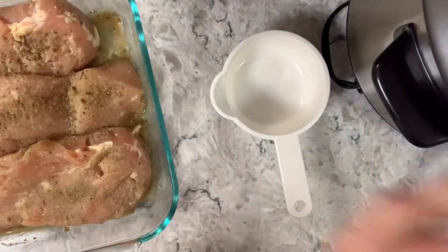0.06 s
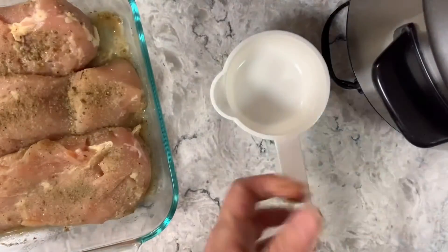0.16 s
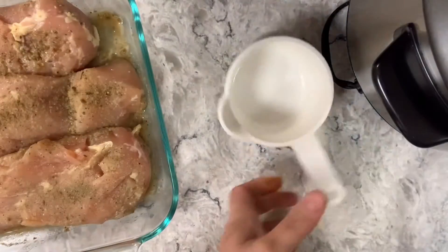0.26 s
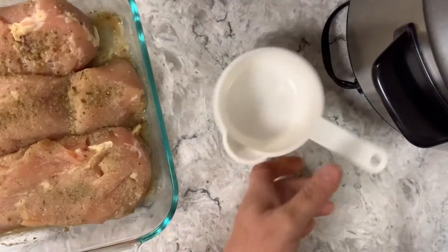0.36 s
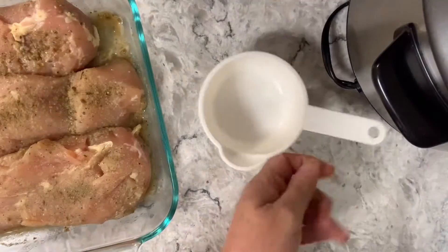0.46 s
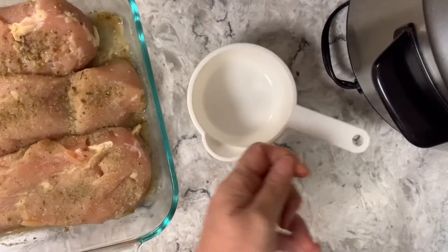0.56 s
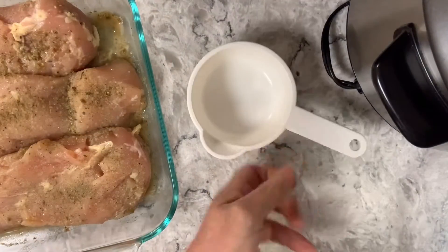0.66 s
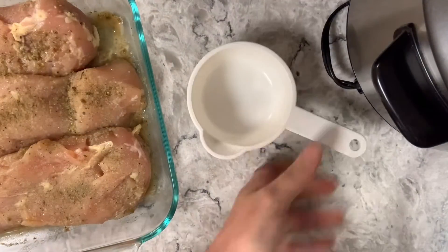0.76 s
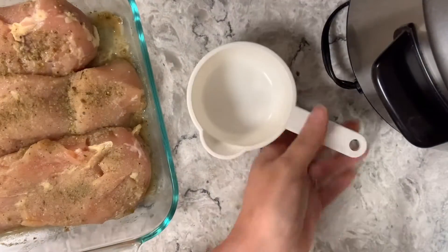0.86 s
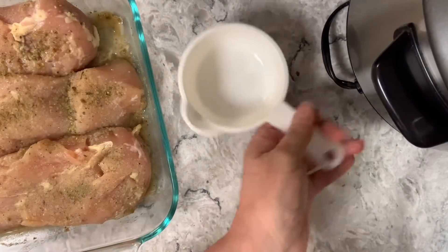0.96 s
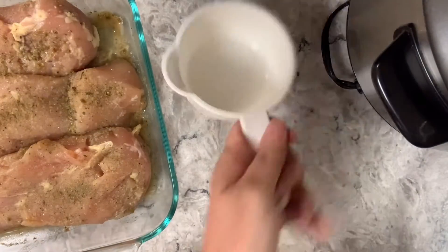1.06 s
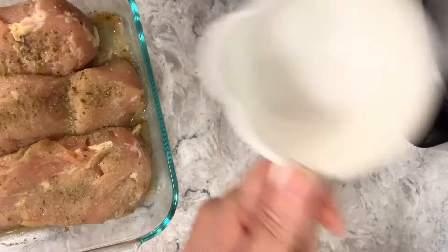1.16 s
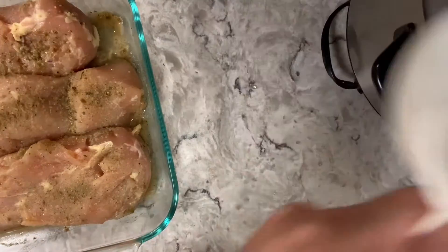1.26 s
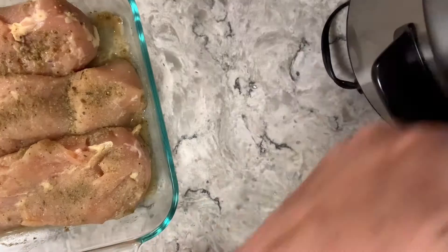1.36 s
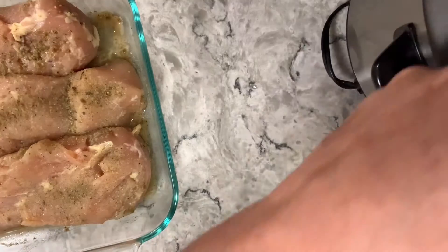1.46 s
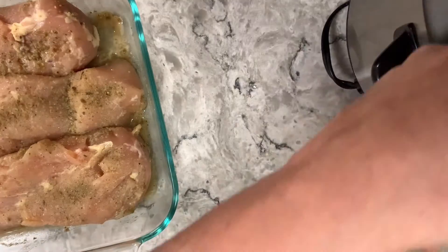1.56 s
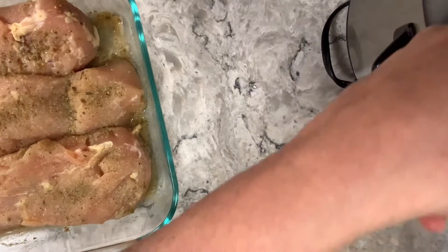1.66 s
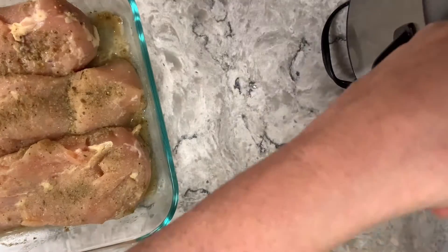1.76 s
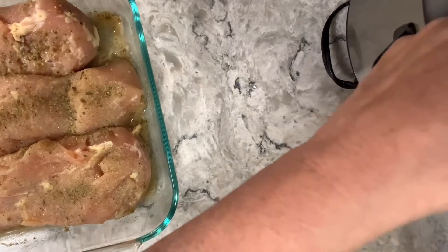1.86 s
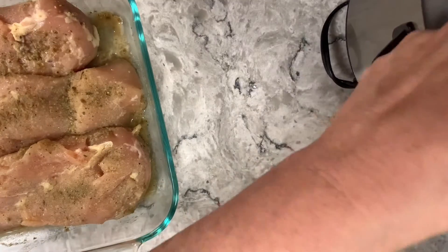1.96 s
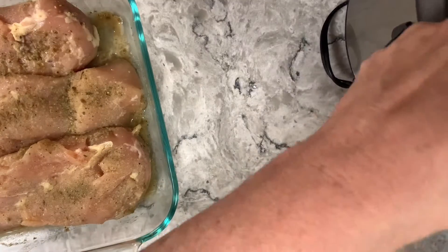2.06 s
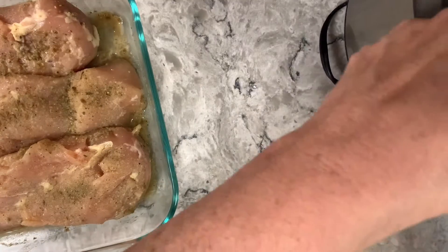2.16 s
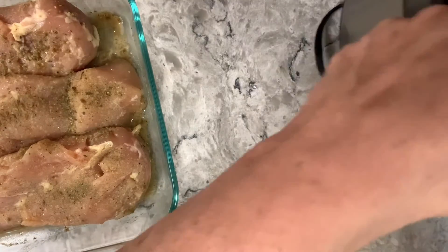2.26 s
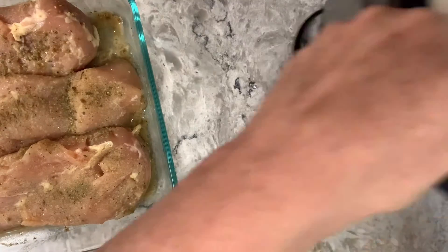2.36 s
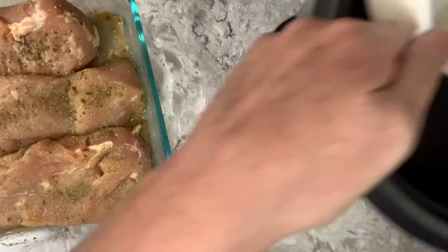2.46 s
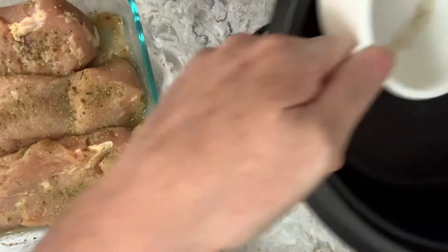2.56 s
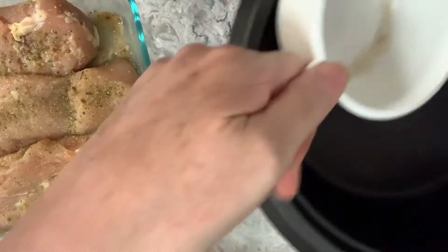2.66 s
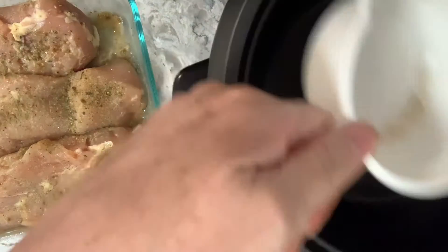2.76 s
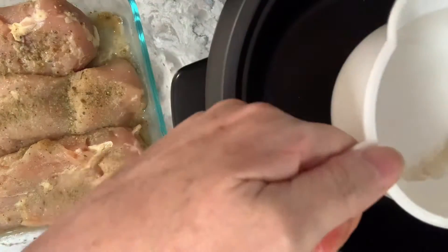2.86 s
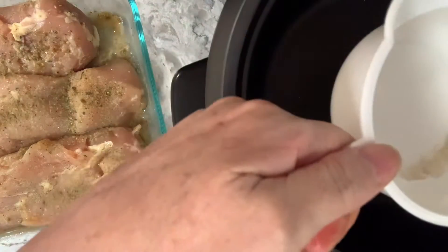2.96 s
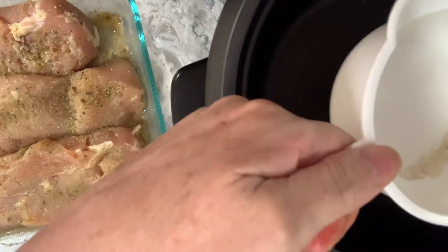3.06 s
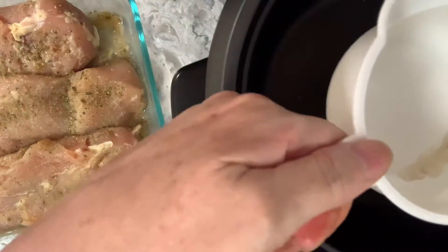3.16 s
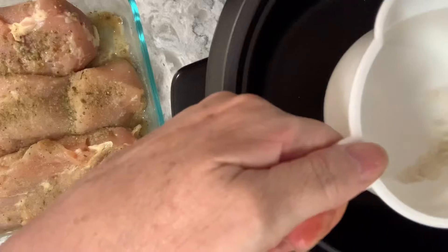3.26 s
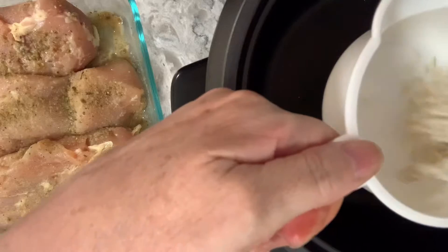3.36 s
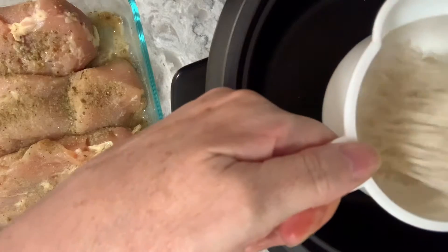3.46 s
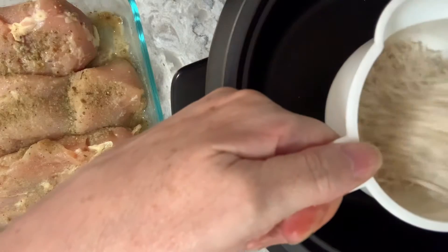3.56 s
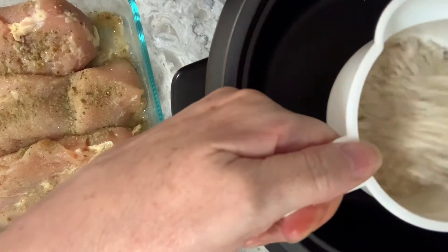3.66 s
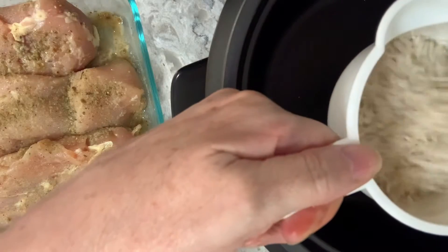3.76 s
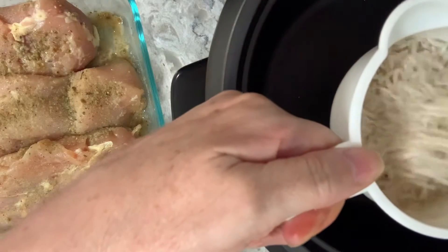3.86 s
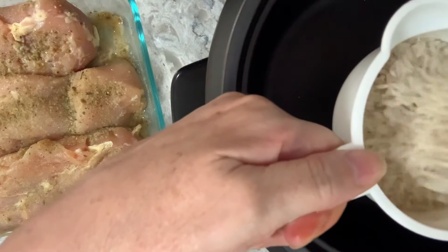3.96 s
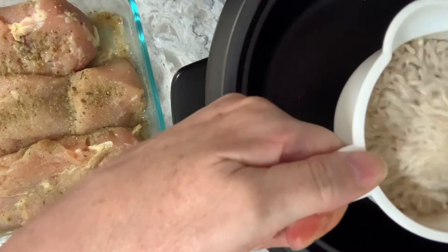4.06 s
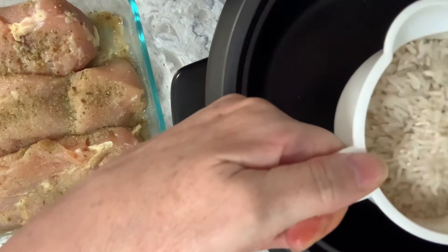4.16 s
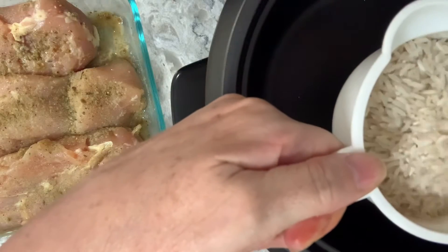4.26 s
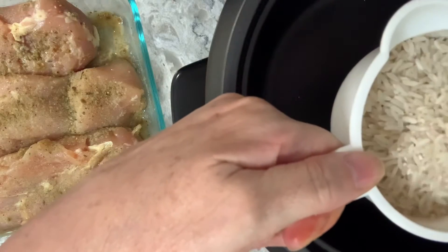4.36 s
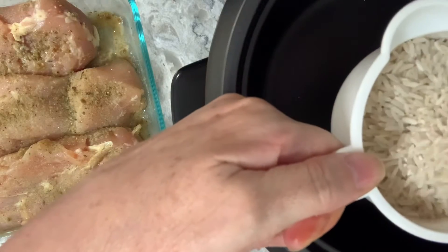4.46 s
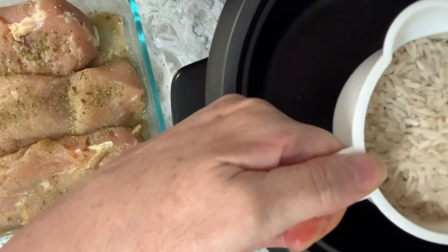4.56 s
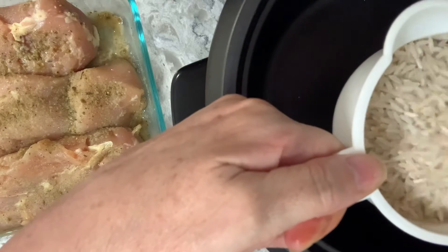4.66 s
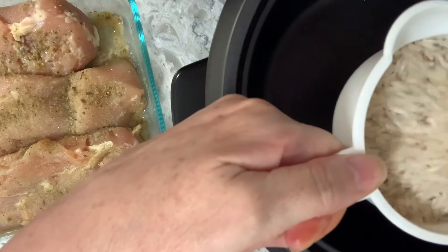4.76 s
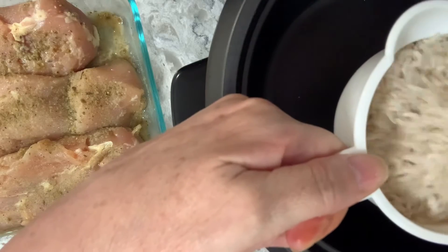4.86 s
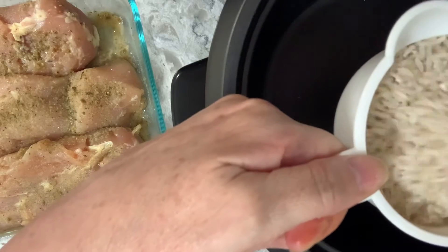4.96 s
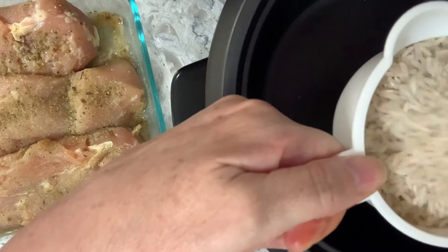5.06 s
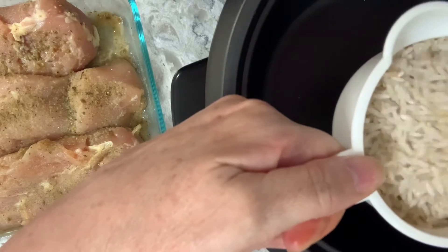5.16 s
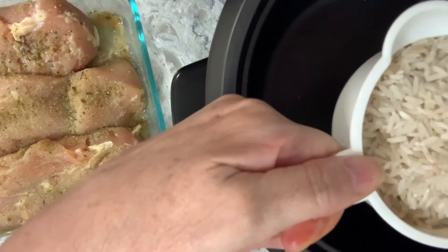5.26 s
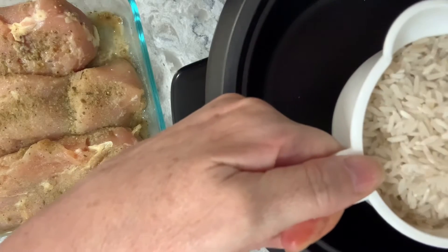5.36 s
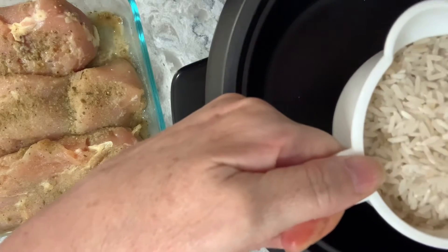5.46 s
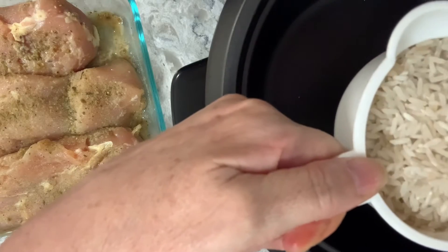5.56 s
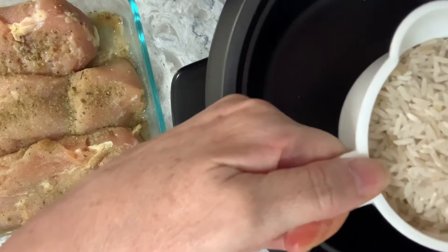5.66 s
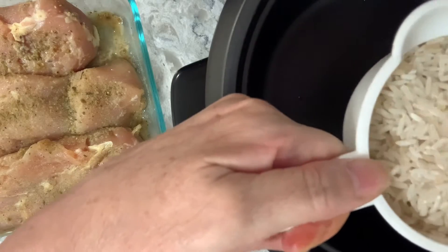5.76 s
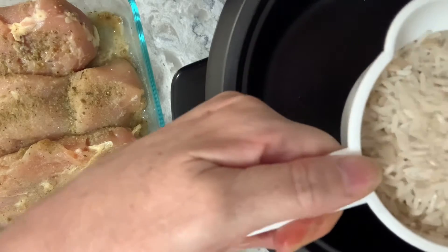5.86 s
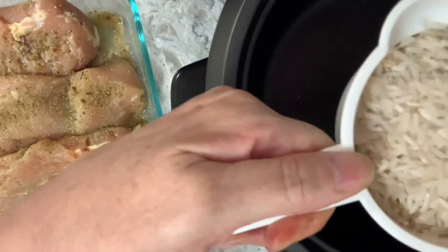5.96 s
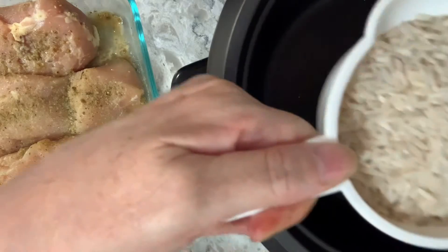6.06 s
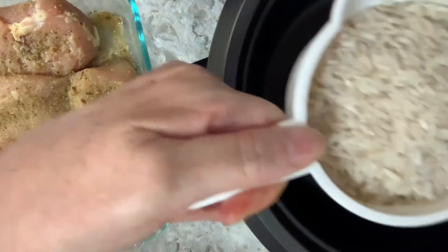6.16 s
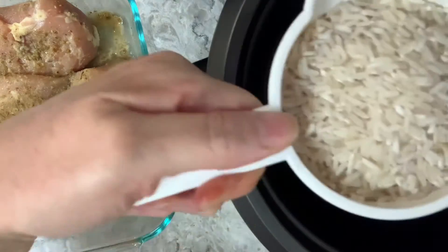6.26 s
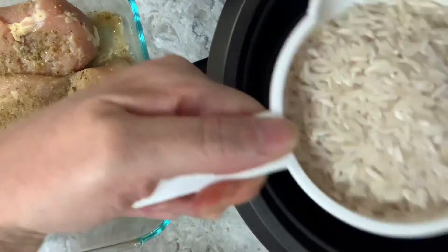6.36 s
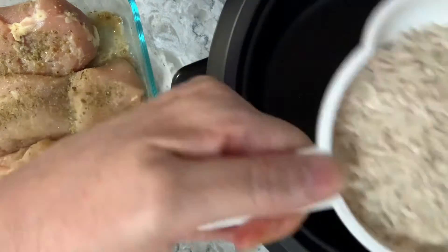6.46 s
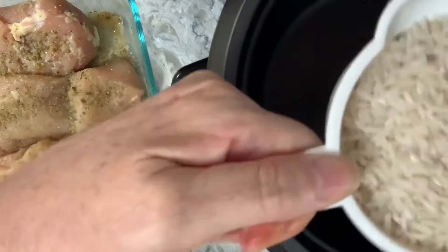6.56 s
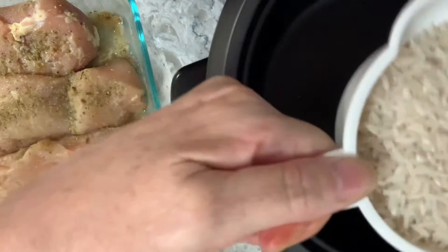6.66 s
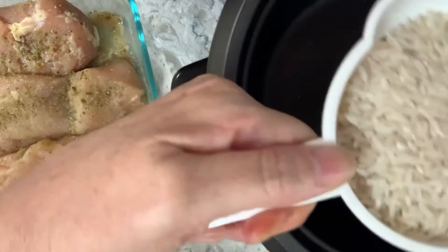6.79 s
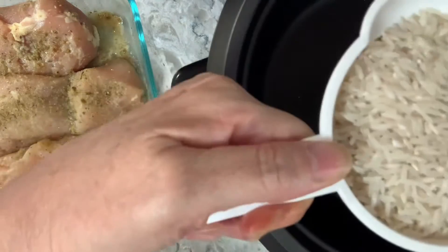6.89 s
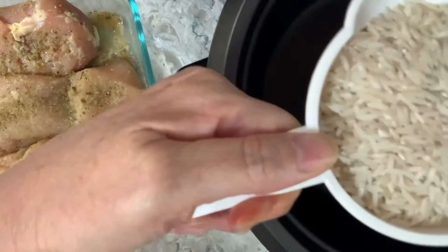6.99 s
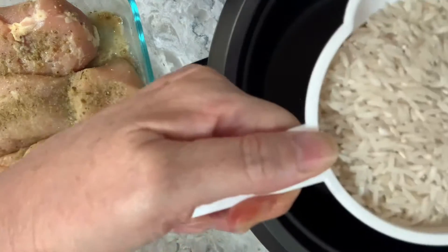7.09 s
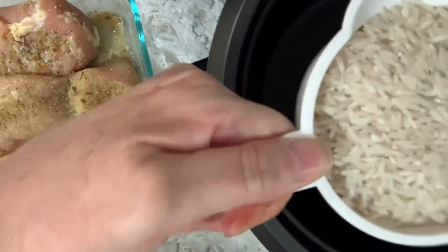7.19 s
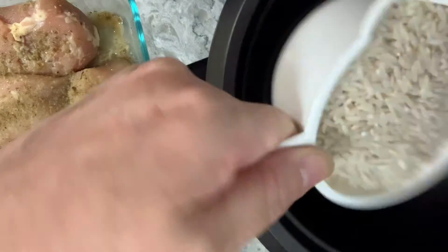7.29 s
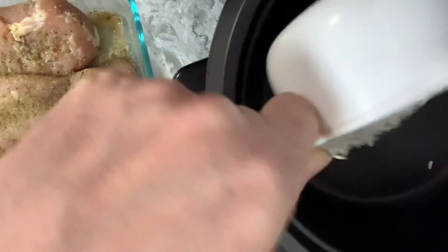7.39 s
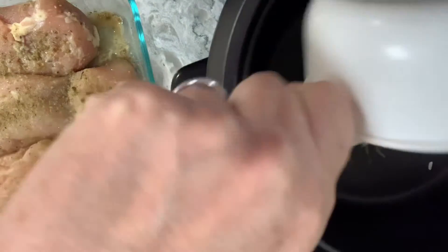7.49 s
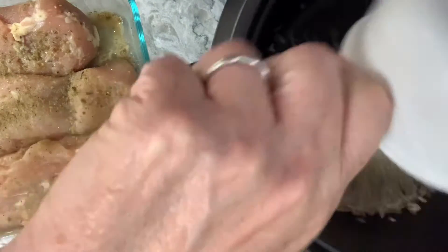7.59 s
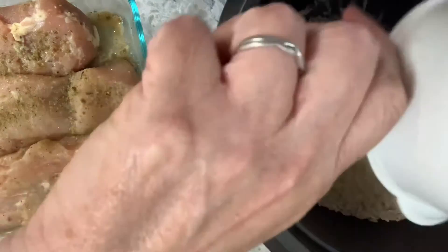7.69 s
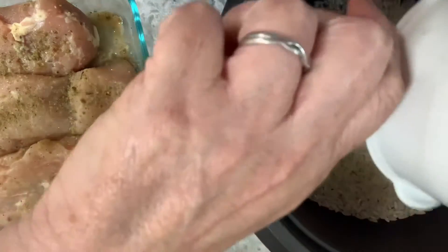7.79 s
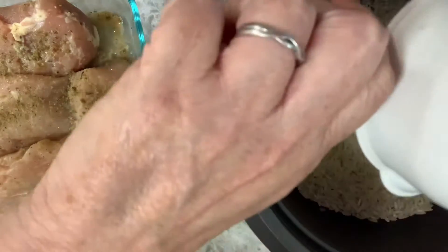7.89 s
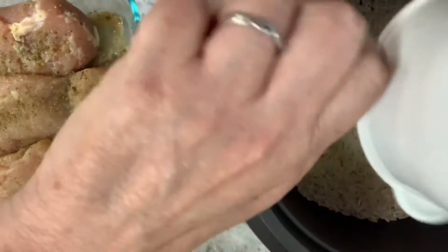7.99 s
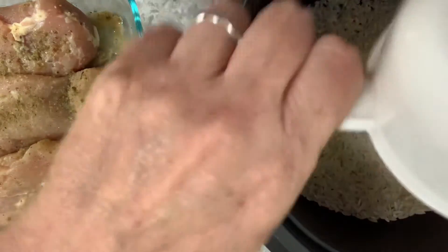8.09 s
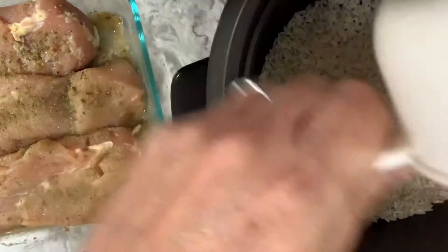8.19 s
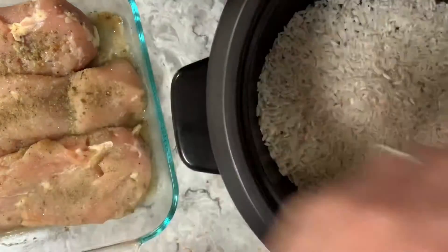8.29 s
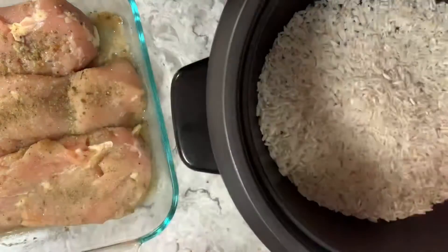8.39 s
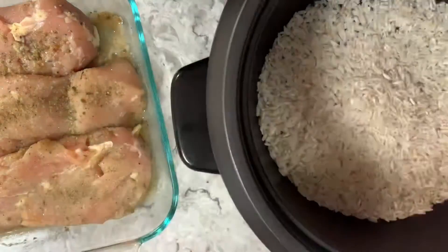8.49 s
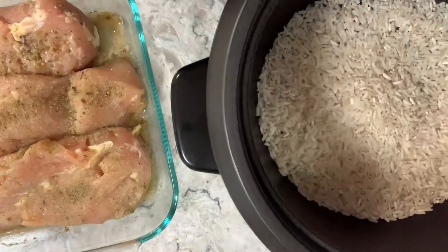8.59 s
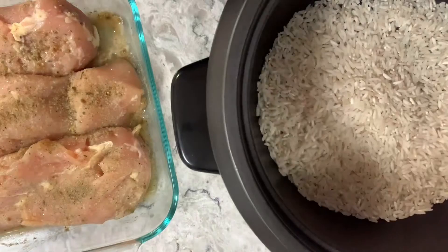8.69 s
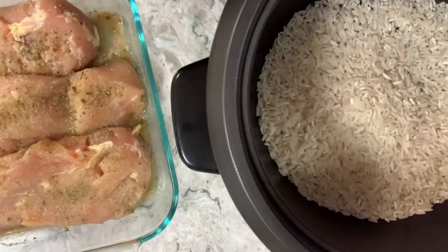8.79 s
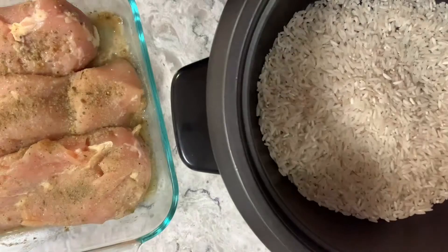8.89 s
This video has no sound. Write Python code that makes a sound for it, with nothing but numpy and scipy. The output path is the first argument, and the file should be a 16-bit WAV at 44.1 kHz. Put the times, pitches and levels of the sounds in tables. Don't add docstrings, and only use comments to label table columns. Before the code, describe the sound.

Close stereo phone capture in a tiled kitchen with a soft fridge hum. Fingers brush stone and a plastic cup clacks; a pot bumps and grinds along the counter. Dry rice rattles brightly into the hollow cup, thins to trickling grains, then the cupful crashes into the pot with a metallic hiss. A last few ticks and a sleeve rustle follow.

```python
import sys
import numpy as np
from scipy import signal
from scipy.fft import rfft, irfft, next_fast_len
from scipy.io import wavfile
from scipy.ndimage import uniform_filter1d

SR = 44100
rng = np.random.default_rng(int(sys.argv[2]) if len(sys.argv) > 2 else 0)


def generate_wav(signal):
    frames = np.transpose(np.atleast_2d(signal))
    scaled = np.clip(frames, -1, 1) * 32767
    pcm = np.round(scaled).astype(np.int16)
    wavfile.write(sys.argv[1], SR, pcm)


def attenuation_scalar(level_db):
    decades = np.asarray(level_db, float) / 20
    return 10 ** decades


N = 393930


def level(x, db=0):
    return x * attenuation_scalar(db) / np.sqrt(np.mean(x ** 2))


def joined(*levels_db):
    return 10 * np.log10(sum(attenuation_scalar(db) ** 2 for db in levels_db))


def track(tables):
    t = np.arange(N) / SR
    out = np.full(N, -140.)
    for rows in tables:
        s, db = np.transpose(rows)
        inside = (t >= s[0]) & (t <= s[-1])
        out[inside] = np.interp(t[inside], s, db)
    return out


def swells(rows, order=1):
    t = np.arange(0, N + 32, 32) / SR
    s, db, rise, fall = np.array(rows, float).T[:, :, None]
    before = (s - t) / np.maximum(rise, .001)
    after = (t - s) / np.maximum(fall, .001)
    drop = np.where(t < s, before, after)
    total_db = joined(*np.maximum(db - 20 * drop ** order, -150))
    return np.interp(np.arange(N) / SR, t, total_db)


def sudden(rows):
    return swells([(s, db, 0, fall) for s, db, fall in rows])


def walk(rate):
    k = int(SR / rate)
    steps = np.repeat(rng.standard_normal(N // k + 1), k)
    return 1.3 * uniform_filter1d(uniform_filter1d(steps, k), k)[:N]


def clicks(rate, spread_db):
    hit = rng.random(N) < rate / SR
    size_db = spread_db * np.minimum(rng.exponential(size=N), 4.5)
    return level(hit * rng.standard_normal(N) * attenuation_scalar(size_db))


def colour(x, points):
    hz, db = np.transpose(points)
    log_hz = np.log(np.arange(2049) * SR / 4096 + 1)
    cep = irfft(np.interp(log_hz, np.log(hz), db) * np.log(10) / 20)
    cep[1:2048] *= 2
    cep[2049:] = 0
    return signal.fftconvolve(x, irfft(np.exp(rfft(cep))))[:len(x)]


def resonate(x, peaks):
    out = 0
    for k, (hz, width, db) in enumerate(peaks):
        out = out + (-1) ** k * attenuation_scalar(db) * signal.lfilter(*signal.iirpeak(hz, hz / width, SR), x)
    return out


def slides(rows, t60=0.022):
    out = np.full(N, 1e-7)
    t = np.arange(4000) / SR
    start_s = 0.0018 * t60 / 0.022
    shape = attenuation_scalar(-2 - 60 * t / t60) * np.minimum(t / start_s, 1)
    for s, db in rows:
        out[int(s * SR):][:len(t)] += attenuation_scalar(db) * shape
    return out


# pitch in Hz, level in dB per Hz.
ROOM_TONE = [(15, -52.5), (25, -26.5), (40, -12.5), (56, -3), (80, -7.5), (212, -5.5), (384, -14.5),
             (439, -15.5), (545, -20), (840, -23), (1190, -29), (1840, -41.5), (16000, -75.5)]
# pitch in Hz, width in Hz, level in dB.
FRIDGE = [(58.4, 29, 7), (110, 5.3, -1), (160, 49, -13), (211, 37, -1), (330, 27, -3)]


def kitchen():
    room_db = -58
    both, apart = (level(colour(rng.standard_normal(N), ROOM_TONE)) for _ in range(2))
    hum = level(resonate(rng.standard_normal(N), FRIDGE), -4.5)
    both = level((both + hum) * attenuation_scalar(.8 * walk(4)), room_db)
    return both + level(apart, room_db - 4.0) * np.array([[1], [-1]])


# peak in seconds, level in dB, seconds to rise 20 dB, seconds to fall 20 dB.
RUBS = [(.88, -62, -1.85, 0.26), (1.146, -76, 27, 1.7), (2.42, -62.5, 0.6, 0.4), (2.572, -52.5, 0.08, 0.08),
        (3.02, -64.5, -0.02, -1.5), (3.13, -63, 0.35, 3), (6.75, -71, 0.15, 0.12), (8.28, -83, 1.3, 2)]
# start in seconds, level in dB, seconds to fall 20 dB.
GRABS = [
    (.2, -52, -0.12),
    (.42, -39, -0.1274),
]
# pitch in Hz, level in dB per Hz.
SKIN = [(470, -31.5), (800, -8), (1690, -17.5), (7820, -22), (9570, -22), (11900, -30.5), (13500, -44.5),
        (16500, -66)]


def skin():
    grip = attenuation_scalar(3 * walk(25))
    rub = level(colour(grip * clicks(rate=30000, spread_db=4.0), SKIN))
    return attenuation_scalar(joined(swells(RUBS), sudden(GRABS)) + 6.5) * rub


# peak in seconds, level in dB, seconds to rise 20 dB, seconds to fall 20 dB.
FLARES = [(.06, -80, .1, .1), (.16, -72, .03, .03), (.6, -65, .02, .1), (.64, -66, .04, .04),
          (.675, -66, .05, .04), (.735, -60, .025, .02), (1.3, -74, .01, .08), (1.48, -68, .12, .25)]


def whine():
    tone = resonate(rng.standard_normal(N), [(11900, 50, 0), (7900, 120, -12.5)])
    return attenuation_scalar(swells(FLARES)) * level(tone)


# start in seconds, peak in dB, main ring in Hz, crack in dB.
NUDGES = [(0.188, -39.5, 1105, 9.5), (0.211, -31.5, 1060, -24), (0.219, -30, 1146, -12),
          (0.219, -32, 1470, -22), (0.349, -32, 1380, -2), (.35, -38, 1900, -13.5), (0.352, -28, 950, -19),
          (0.363, -29, 962, -21), (.389, -36, 1200, -6), (0.4097, -18.5, 1820, 1), (.411, -28, 2450, -6),
          (0.413, -22, 1360, -10.5), (.419, -21.5, 1490, -11), (0.428, -22.5, 890, -24),
          (.437, -24, 885, -18), (.448, -29, 845, -21)]
# start in seconds, peak in dB, main ring in Hz, body in dB.
BUMPS = [(1.832, -22.5, 343, 4.5), (1.873, -3, 308, 3.5), (2.032, -29, 330, 12), (2.141, -20.5, 366, -25),
         (2.347, -24, 363, -2.5), (2.378, -25, 641, -3), (2.404, -21, 292, 7), (2.745, -22, 338, 0.5)]
# start in seconds, peak in dB, main ring in Hz, crack in dB.
TAPS = [(1.687, -34, 640, -6), (1.949, -27, 1130, -12.5), (2.617, -33, 1047, -9),
        (2.997, -17.5, 1130, -24.5), (3.138, -42.5, 1250, 1.5), (3.196, -41, 1170, 2.5),
        (3.641, -36.5, 640, 3.5), (3.641, -36, 1870, 6), (7.421, -24.5, 603, -1.5)]
# start in seconds, peak in dB, main ring in Hz.
RINGS = [(1.876, -10, 660), (1.899, -12, 421.3), (2.049, -29, 565), (2.419, -28, 474), (2.7, -34, 530),
         (7.566, -32, 330)]
# start in seconds, peak in dB, main ring in Hz, 60 dB fall in seconds.
THUDS = [(2.447, -9, 1056, 0.021), (2.583, -28.5, 630, .027), (2.628, -26, 900, 0.04),
         (2.636, -16.5, 662, 0.044), (2.975, -34, 1100, .03), (2.9902, -27, 560, .025),
         (2.99, -7, 1075, 0.039), (5.716, -42.5, 1100, .015), (5.7211, -18, 850, 0.013),
         (5.7215, -27, 1300, 0.012), (7.5405, -18.5, 325, .055), (7.541, -23, 655, .05),
         (2.034, -22, 560, .06), (2.034, -26, 1230, .03)]


def blows():
    nudges = [(s, db, hz, .027, crack, -6) for s, db, hz, crack in NUDGES]
    taps = [(s, db, hz, 0.058, crack, -10.5) for s, db, hz, crack in TAPS]
    thuds = [(*row, -21, -4) for row in THUDS]
    bumps = [(s, db, hz, 0.063, -13, body) for s, db, hz, body in BUMPS]
    rings = [(*row, 0.085, -28, -0.5) for row in RINGS]
    return nudges + taps + thuds + bumps + rings


# pitch in Hz, level in dB.
POT_BODY = [(302, -6), (433, -12), (544, -4), (680, -6), (856, -4.5), (1153, -10), (1440, -14),
            (1840, -10.5), (2200, -6.5), (2850, -5), (3440, -11), (3838, -10.5), (4250, -9)]


def knock(main_hz, t60, crack_db, body_db):
    t = np.arange(6000) / SR
    hz, mode_db = np.transpose(POT_BODY)
    chance = rng.standard_normal(len(hz))
    fade = attenuation_scalar(-60 * t / t60)

    above = 0.18 * np.sin(2 * np.pi * 1.1 * main_hz * t)
    below = 0.19 * np.sin(2 * np.pi * 0.86 * main_hz * t)
    main = np.sin(2 * np.pi * main_hz * t) + (above + below) * fade ** 0.3

    modes = np.sin(2 * np.pi * np.outer(hz * (1 + 0.01 * chance), t)) * attenuation_scalar(-np.outer(hz, t) / 7)
    dull_db = min(crack_db, 0)
    reach_db = .45 * dull_db * np.maximum(np.log2(hz / 1100), 0) + 2.5 * chance[::-1]
    body = attenuation_scalar(mode_db + reach_db) @ modes
    rings = (0.87 * main + 0.28 * attenuation_scalar(body_db) * body) * fade * np.minimum(t * main_hz / 1.3, 1)

    crack = rng.standard_normal(len(t)) * (attenuation_scalar(-60 * t / 0.098) + 0.73 * fade) * np.minimum(t / 0.00047, 1)
    crack_tone = [(500, -11.0), (2500, -3.5), (7000, -2.5 + .2 * dull_db), (16000, -19 + .6 * dull_db)]
    return rings + 0.56 * attenuation_scalar(crack_db) * colour(crack, crack_tone)


def knocks():
    out = np.zeros(N + 6000)
    for s, db, main_hz, t60, crack_db, body_db in blows():
        out[int(s * SR):][:6000] += attenuation_scalar(db) * knock(main_hz, t60, crack_db, body_db)
    return out[:N]


# start in seconds, level in dB, seconds to fall 20 dB.
SCUFFS = [(.19, -46, -0.08), (.349, -29, -0.425), (.41, -35, 0.12), (.868, -54, -0.42),
          (1.835, -39.5, -0.46), (1.873, -38.5, 0.5), (2.4, -49.5, -1.4), (7.55, -50, -0.4)]
# peak in seconds, level in dB, seconds to rise 20 dB, seconds to fall 20 dB.
GRINDS = [(1.992, -48, 0.26, 0.78), (2.428, -38, 0.14, 0.46), (2.72, -47, 0.63, 0.22),
          (7.51, -38, 0.015, 0.19)]
# peak in seconds, level in dB, seconds to rise 20 dB, seconds to fall 20 dB.
SHOVES = [(.19, -50, 0.0028, 0.15), (.42, -54, 0.06, 0.15), (1.9, -35, 0.063, 0.2),
          (2.428, -34.5, 0.063, 0.16), (2.804, -43, 0.31, 0.17), (3.056, -52, 0.19, 0.11)]
# pitch in Hz, width in Hz, level in dB.
POT_WALL = [(334.4, 45, -2), (394, 16, -1), (543, 190, -4), (657.6, 70, -1)]
# pitch in Hz, width in Hz, level in dB.
SLAB = [(69.4, 90, -4), (118.7, 24, 4), (207, 78, -2.5)]


def drag():
    scuff, grind = sudden(SCUFFS), swells(GRINDS)
    grip_db = 2.5 * walk(35)
    wall_db = joined(grind, scuff - 13) + grip_db
    rim_db = joined(scuff, grind - 4) + grip_db
    boom_db = joined(swells(SHOVES), scuff - 11, grind - 12.5) + grip_db

    rim_notes = [(960, 590, 1.5), (1130, 48, -1), (1900, 690, -6)]  # (Hz, width Hz, dB)
    wall = level(resonate(resonate(clicks(rate=700, spread_db=-4.5), POT_WALL), POT_WALL))
    rim = level(resonate(resonate(clicks(rate=970, spread_db=2.5), rim_notes), rim_notes))
    boom = level(resonate(resonate(rng.standard_normal(N), SLAB), SLAB))
    return attenuation_scalar(wall_db + 0.5) * wall + attenuation_scalar(rim_db - 3.5) * rim + attenuation_scalar(boom_db + 1.5) * boom


# start in seconds, peak in dB.
DRY_GRAINS = [(.59, -55), (.67, -55), (.73, -56), (6.742, -58), (7.775, -24), (7.7785, -12), (7.782, -12),
              (7.807, -27), (7.833, -32), (7.8746, -30), (7.91, -44.5), (7.9195, -43), (7.9314, -42.5),
              (7.945, -44), (7.985, -58), (8.0816, -58), (8.2382, -58), (8.2617, -43.5), (8.3171, -54.5)]
# pitch in Hz, level in dB.
DRY_TONE = [(3000, -28), (6000, -15.5), (8000, -1), (12000, 1), (16000, -7)]
# peak in seconds, level in dB, seconds to rise 20 dB, seconds to fall 20 dB.
EMPTIES = [(7.77, -47, .3, .07)]
# pitch in Hz, width in Hz, level in dB.
EMPTY_AIR = [(1240, 130, 0), (690, 90, -6)]


def dry_grains():
    ticks = colour(slides(DRY_GRAINS, t60=.008) * rng.standard_normal(N), DRY_TONE)
    air = level(resonate(resonate(clicks(rate=1500, spread_db=2.5), EMPTY_AIR), EMPTY_AIR))
    return attenuation_scalar(9) * ticks + attenuation_scalar(swells(EMPTIES)) * air


# peak in seconds, level in dB, seconds to rise 20 dB, seconds to fall 20 dB.
SWISHES = [
    [(1.48, -48, 0.13, 0.1)],
    [(.91, -59, 0.12, 0.17), (1.1, -69.5, 13.5, -0.64)],
    [(8.47, -59, 0.2, 0.13), (8.55, -56, 0.09, 0.05), (8.62, -67, 0.14, 0.3)],
]
# pitch in Hz, level in dB per Hz.
SLEEVE = [
    [(1180, -57.5), (2300, -30.5), (3150, -2), (4300, -20), (5470, -16), (8510, -2.5), (9380, -13.5),
     (11700, -1), (13200, -16.5), (15100, -2), (15800, -2.5), (16500, -33.5)],
    [(1180, -50), (2000, -8), (4160, -16), (8580, -13.5), (9380, -2.5), (10200, -9.5), (14800, -15),
     (16500, -23)],
]
# pitch in Hz, level in dB per Hz.
CUFF = [(1500, -40), (2800, -14.5), (4200, -4), (5600, -13.5), (8300, -7.5), (11500, -8.5), (14800, -9.5),
        (16500, -23)]


def sleeve():
    out = np.zeros(N)
    for sweep, cloth in zip(SWISHES, SLEEVE + [CUFF]):
        sweep_db = swells(sweep, order=2) + 1.5 * walk(40)
        out += attenuation_scalar(sweep_db) * level(colour(rng.standard_normal(N), cloth))
    return out


def pour(grain_db, ring_db, burst, grain, vessel, wall_t60, lumpy):
    clumps_db = lumpy * (2.5 * walk(35) + 3.5 * walk(120))
    t = np.arange(2048) / SR
    bright = 0
    for _ in range(3):
        rattle = (rng.standard_normal(len(t)) + 9 * (t == 0)) * attenuation_scalar(-60 * t / wall_t60)
        rattle = colour(rattle, grain)
        flow = attenuation_scalar(grain_db + clumps_db + 2 * walk(11))
        hail = flow * clicks(rate=1300, spread_db=1.5) + burst * rng.standard_normal(N)
        bright += signal.oaconvolve(hail, rattle)[:N] / np.sqrt(3 * np.sum(rattle ** 2))
    thumps = clicks(rate=2900, spread_db=1.5)
    ring = attenuation_scalar(ring_db + 0.5 * clumps_db) * thumps
    usual = np.std(resonate(resonate(thumps[:SR], vessel), vessel))
    return bright + resonate(resonate(ring, vessel), vessel) / usual


# time in seconds, level in dB.
FLOW = [
    [(1.674, -31), (1.762, -36.5), (1.77, -46), (1.862, -37), (1.88, -29.5), (1.914, -50), (2.136, -49),
     (2.182, -61.5), (2.3, -59.5)],
    [(3.196, -46.5), (3.27, -35), (3.3, -28), (3.396, -26), (3.562, -42), (3.64, -42.5)],
    [(3.64, -45), (3.81, -49.5), (4.46, -60.5), (4.78, -47.5), (5.26, -56), (5.96, -62.5), (6.0, -92)],
]
# peak in seconds, level in dB, seconds to rise 20 dB, seconds to fall 20 dB.
SURGES = [(3.641, -29, -0.08, 0.11), (3.735, -46, 0.15, 0.14), (3.84, -39, 0.23, .6),
          (4.41, -45, 0.47, 0.04), (5.29, -51, -1.54, 0.13), (5.6, -50.5, -0.1, -0.34),
          (6.42, -52, -0.06, 0.07), (6.53, -54.5, 0.06, 0.11)]
# start in seconds, peak in dB.
SHAKES = [(1.6735, -15), (1.6848, -16), (1.704, -14), (1.7209, -10), (1.737, -16.5), (1.7493, -12.5),
          (1.756, -17.5), (1.7815, -15), (1.8587, -18), (1.868, -17.5), (1.8746, -4.5), (1.9475, -15.5),
          (1.972, -28), (2.019, -29.5), (2.0335, -22.5), (2.0733, -22.5), (2.138, -28), (2.4464, -42),
          (2.9899, -21), (3.1394, -19), (3.1951, -12), (3.2116, -16), (3.222, -18.5), (3.243, -14.5),
          (3.249, -15.5), (3.2623, -9.5), (3.2784, -11.5), (3.303, -14), (3.311, -16), (3.324, -14),
          (3.333, -16), (3.3457, -19), (3.362, -15.5), (3.374, -22), (3.382, -14), (3.389, -15),
          (3.402, -16), (3.413, -13.5), (3.436, -15), (3.474, -16.5), (3.526, -26.5)]
# start in seconds, peak in dB.
STRAYS = [(3.58, -30), (3.597, -21), (3.6394, -18.5), (6.8342, -57), (7.2817, -40), (7.3002, -28.5),
          (8.1077, -54.5), (8.2614, -46)]
# start in seconds, peak in dB.
SLIPS = [(3.7336, -21.5), (3.7682, -26), (3.779, -21), (3.817, -31), (3.839, -25.5), (3.9457, -25),
         (4.0196, -31), (4.1563, -36), (4.1837, -36), (4.241, -32), (4.2745, -36.5), (4.335, -33.5),
         (4.3838, -36), (4.4017, -34.5), (4.4436, -41), (4.4676, -34.5), (4.489, -35.5), (4.555, -27.5),
         (4.5883, -30), (4.6082, -37), (4.6606, -30.5), (4.6821, -30.5), (4.732, -30)]
# start in seconds, peak in dB.
TRICKLE = [(4.7828, -33), (4.8342, -30.5), (4.8476, -29), (4.9025, -38), (4.913, -39), (4.9619, -34),
           (5.0013, -33.5), (5.0257, -47), (5.0382, -43), (5.0696, -40), (5.1235, -41.5), (5.1514, -42),
           (5.2223, -43.5), (5.2412, -37), (5.2846, -34), (5.2931, -31.5), (5.3131, -33), (5.359, -36),
           (5.3824, -30.5), (5.4318, -32), (5.4717, -39.5), (5.5126, -37), (5.5276, -32), (5.5725, -34),
           (5.6249, -35.5), (5.6518, -49.5), (5.6972, -49.5), (5.7226, -45), (5.7431, -37.5), (5.7935, -45),
           (5.8254, -44), (5.8369, -41), (5.8933, -33.5), (5.9297, -38.5), (5.9546, -32), (6.0519, -65),
           (6.1008, -53.5), (6.1257, -52), (6.1397, -37), (6.2245, -45), (6.3213, -64), (6.3417, -54.5),
           (6.3552, -35), (6.3787, -43), (6.39, -43), (6.3976, -41), (6.4026, -41), (6.412, -35),
           (6.419, -41), (6.427, -36), (6.5114, -41), (6.5213, -37), (6.5937, -46.5)]
# pitch in Hz, level in dB.
GRAIN = [(900, -26), (1900, -15), (2900, -6), (3600, -11), (4800, -2.5), (11500, 4), (15000, -0.5),
         (16500, -18)]
# pitch in Hz, width in Hz, level in dB.
CUP = [(620, 200, -10), (920, 230, 3), (1200, 260, 8), (1414, 490, 2), (1997, 300, -2.5),
       (2970, 1100, -2.5), (4100, 340, -5), (4550, 670, -2)]


def rice_in_cup():
    empty_ring_db, fills_from_s, muffle_db_per_s = -4.5, 3.24, 6
    shakes = slides(SHAKES)
    burst = shakes + slides(SLIPS + TRICKLE + STRAYS)
    flow_db = track(FLOW)
    filling_s = np.maximum(np.arange(N) / SR - fills_from_s, 0)
    ring_db = flow_db + empty_ring_db - muffle_db_per_s * filling_s
    ring_db = joined(ring_db, 20 * np.log10(shakes) - 15)
    return pour(joined(flow_db, swells(SURGES)), ring_db, burst, GRAIN, CUP, wall_t60=0.01, lumpy=.6)


# start in seconds, peak in dB, pitch in Hz.
PINGS = [(1.6725, -21, 1190), (1.686, -22, 1140), (1.703, -28, 1150), (1.711, -27, 1170),
         (1.718, -24, 1210), (1.724, -21, 1150), (1.736, -31, 1130), (1.743, -28, 1180), (1.749, -20, 1170),
         (1.762, -31, 1180), (1.781, -30, 1210), (1.79, -35, 1150), (1.805, -34, 1130), (1.827, -34, 1170),
         (3.195, -23, 1180), (3.222, -28, 1140), (3.246, -26, 1250), (3.263, -21, 1120), (3.279, -22, 1200),
         (3.304, -22, 1260), (3.324, -19, 1250), (3.332, -20, 1230), (3.346, -21, 1060), (3.354, -22, 1240),
         (3.373, -19, 1050), (3.381, -19, 1180), (3.388, -17, 1220), (3.406, -21, 1240), (3.412, -21, 1080),
         (3.428, -24, 1250), (3.436, -21, 1250)]


def pings():
    out = np.zeros(N + 4000)
    t = np.arange(4000) / SR
    shape = attenuation_scalar(-60 * t / .045) * np.minimum(t / .003, 1)
    for s, db, hz in PINGS:
        extra_db = -1.5 if s > 3.0 else 3
        out[int(s * SR):][:len(t)] += attenuation_scalar(db + extra_db) * shape * np.sin(2 * np.pi * hz * t)
    return out[:N]


# start in seconds, peak in dB, pitch in Hz, 60 dB fall in seconds.
TINGS = [(1.875, -22, 2270, 0.036), (1.873, -24, 3800, 0.035), (1.885, -29.5, 2890, 0.12),
         (1.9, -31, 1900, 0.084), (1.9, -38.5, 4310, 0.23), (1.961, -44, 1437, 0.15),
         (2.034, -26.5, 2270, 0.028), (2.039, -40, 4420, 0.078), (2.746, -42, 1990, 0.05),
         (2.988, -25.5, 4530, 0.021), (3.646, -35.5, 4250, 0.1), (3.645, -34, 6700, 0.14),
         (3.642, -29, 8100, 0.14), (3.67, -39, 7500, .12), (3.845, -42, 6833, 0.22),
         (2.632, -43.5, 5000, .05), (2.632, -40.5, 7600, .05)]


def tings():
    out = np.zeros(N + 9000)
    t = np.arange(9000) / SR
    for s, db, hz, t60 in TINGS:
        pair = np.sin(2 * np.pi * hz * t) + .4 * np.sin(2 * np.pi * 1.013 * hz * t)
        out[int(s * SR):][:len(t)] += attenuation_scalar(db - 60 * t / t60) * pair * np.minimum(t / 0.0011, 1)
    return out[:N]


# time in seconds, level in dB.
DUMP = [
    [(7.26, -71), (7.286, -47.5), (7.415, -44.5)],
    [(7.421, -30), (7.661, -34.5), (7.775, -33.5), (7.79, -45), (7.95, -67), (7.97, -96.5)],
]
# start in seconds, peak in dB.
SPLASHES = [(7.239, -50), (7.4165, -20), (7.4205, -3.5), (7.4235, -6), (7.433, -4), (7.438, -4),
            (7.442, -4), (7.447, -7), (7.454, -8), (7.461, -11), (7.475, -12), (7.49, -15), (7.505, -10),
            (7.51, -13), (7.52, -16), (7.558, -17.5), (7.7376, -32)]
# pitch in Hz, level in dB.
HEAP = [(900, -43), (2000, -8), (3300, -8.5), (4300, -10), (5400, -7), (6800, -4.5), (8000, 3),
        (11500, 3.5), (15000, -0.5), (16500, -12.5)]
# pitch in Hz, width in Hz, level in dB.
POT_AIR = [(627, 120, 3.5), (866, 90, 6.5), (1168, 140, 1), (1890, 120, -2.5), (2850, 150, -4.5),
           (3400, 100, -2.5), (900, 480, -2.5)]
# pitch in Hz, width in Hz, level in dB.
POT_SHINE = [(4220, 35, -3.5), (6590, 55, -3), (7150, 160, -4.5), (8170, 130, 1), (10750, 80, -2)]


def rice_in_pot():
    crash_s = 7.421
    slide_db = track(DUMP)
    crash_db = swells([(crash_s, -24, 0, 0.2)], order=2)
    ring_db = np.where(np.arange(N) / SR > crash_s, slide_db - 9, -140)
    shine = attenuation_scalar(crash_db - 5.5) * level(resonate(rng.standard_normal(N), POT_SHINE))
    return shine + pour(joined(slide_db, crash_db), ring_db, slides(SPLASHES), HEAP, POT_AIR,
                        wall_t60=0.044, lumpy=.45)


def echo(points):
    t = np.arange(20000) / SR
    tail = rng.standard_normal(len(t)) * attenuation_scalar(-60 * t / 0.19) * (t > .003)
    return colour(tail / np.sqrt(np.sum(tail ** 2)), points)


# pitch in Hz, half turns by which the left one leads.
PORTS = [(0, 0), (1500, -.1), (1900, .45), (2500, 1.45), (3360, 1.42), (3800, 2), (4600, 1.9), (5600, 1.2),
         (8600, 2.55), (9400, 3), (11300, 4), (13350, 5), (14600, 6), (17000, 6)]
# pitch in Hz, dB by which the left one is louder.
LEAN = [(200, 1.2), (800, 1), (2200, -2), (6000, 0)]


def microphones(heard):
    size = next_fast_len(N + 4096)
    hz = np.arange(size // 2 + 1) * SR / size
    turn = np.exp(.5j * np.pi * np.interp(hz, *np.transpose(PORTS)))
    lean_hz, lean_db = np.transpose(LEAN)
    turn = turn * attenuation_scalar(np.interp(np.log(hz + 1), np.log(lean_hz), lean_db) / 2)
    spectrum = rfft(heard, size)
    return np.array([irfft(spectrum * turn, size), irfft(spectrum / turn, size)])[:, :N]


# pitch in Hz, level in dB.
TILES = [(100, -13), (1000, -10), (2500, -8.5), (6000, -5.5), (15000, -15.5)]
# pitch in Hz, level in dB.
CORNERS = [(100, -16), (1100, -9), (2000, 1.5), (6000, -4.5), (15000, -9.5)]


def scene():
    near = skin() + whine() + knocks() + drag() + dry_grains() + sleeve()
    near = near + rice_in_cup() + pings() + tings() + rice_in_pot()
    heard = near + attenuation_scalar(-17.5) * signal.fftconvolve(near, echo(TILES))[:N]
    wide = np.array([signal.fftconvolve(near, echo(CORNERS))[:N] for _ in range(2)])
    return microphones(heard) + attenuation_scalar(-1) * wide + kitchen()


def top_cut(x):
    return signal.sosfilt(signal.butter(12, 16970, fs=SR, output="sos"), x)


# low edge in Hz, high edge in Hz, share of the time.
STARVED = [(9000, 9750, .995), (8800, 10200, .35), (12800, 13750, .995), (12600, 14100, .4),
           (5250, 5500, .14), (4900, 5200, .05), (3600, 3900, .16), (3200, 3400, .18), (2400, 2750, .14),
           (2800, 3000, .07), (4000, 4200, .06), (5900, 6200, .05), (15800, 17500, .92)]


def record(dry):
    firm = signal.sosfilt(signal.butter(4, 44, "high", fs=SR, output="sos"), dry)
    firm = 0.88 * np.tanh(firm / 0.79)
    firm = signal.sosfilt(signal.ellip(8, .2, 70, 16800, fs=SR, output="sos"), firm)

    hz, _, mid = signal.stft(firm.mean(0), SR, nperseg=1024)
    frames = mid.shape[1]
    lost = np.zeros(mid.shape, bool)
    for low, high, share in STARVED:
        empty = np.repeat(rng.random(frames // 4 + 1) < share, 4)[:frames]
        lost |= np.outer((hz > low) & (hz < high), empty)
    treble = np.sum(np.abs(mid[hz > 5000]) ** 2, axis=0)
    lost[:, treble > 8 * np.roll(treble, 2)] = False
    missing = signal.istft(mid * lost, SR, nperseg=1024)[1][:N]
    return top_cut(firm - missing)


dry = scene()
out = record(dry)
generate_wav(out)
```